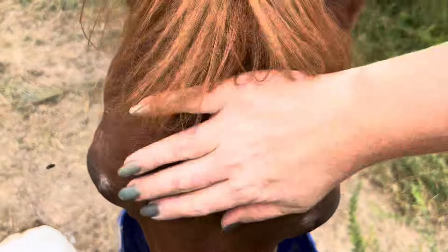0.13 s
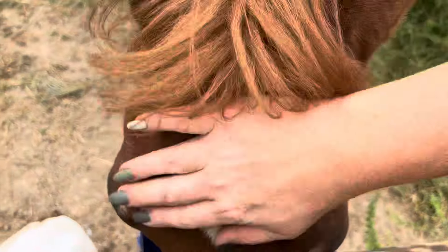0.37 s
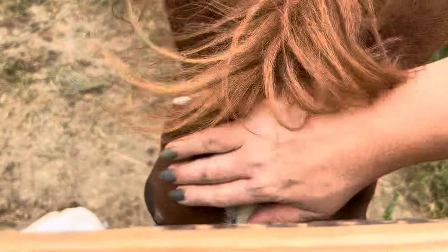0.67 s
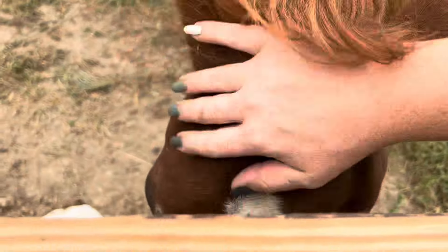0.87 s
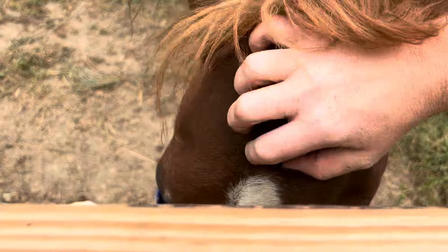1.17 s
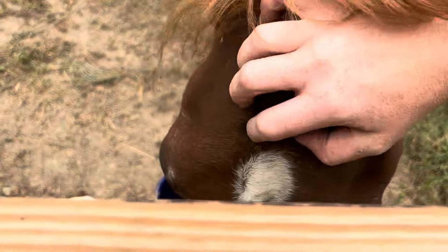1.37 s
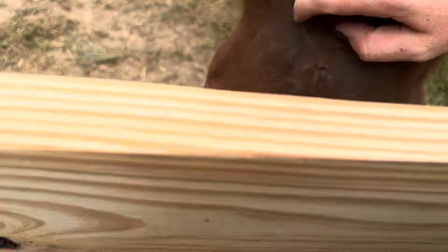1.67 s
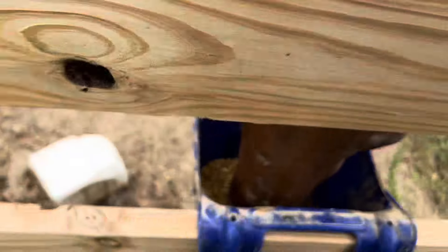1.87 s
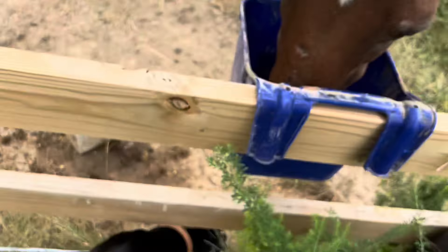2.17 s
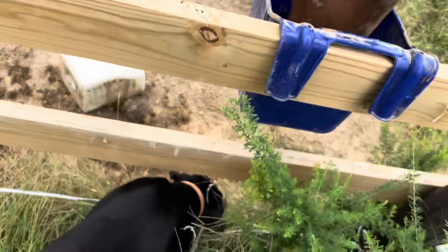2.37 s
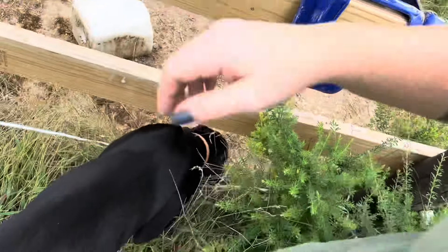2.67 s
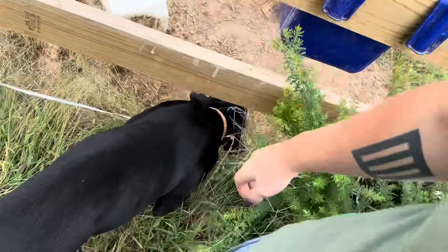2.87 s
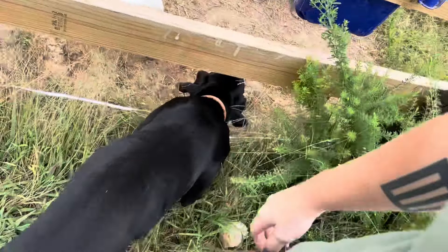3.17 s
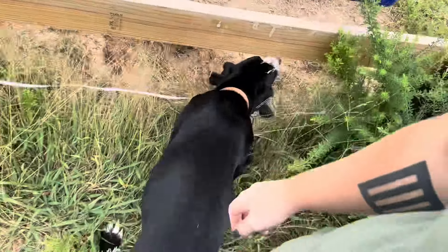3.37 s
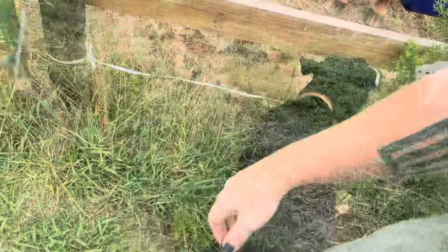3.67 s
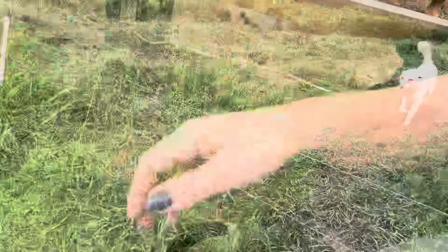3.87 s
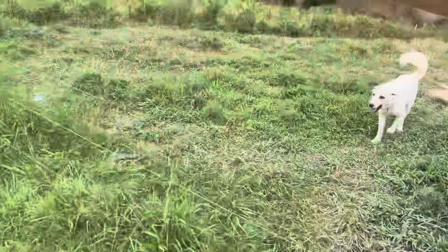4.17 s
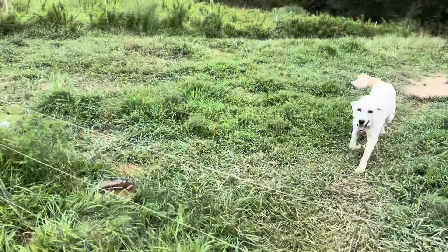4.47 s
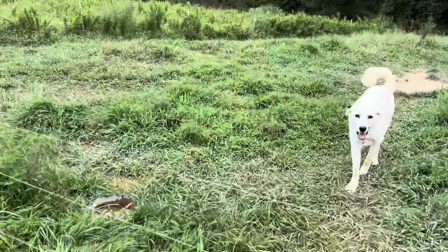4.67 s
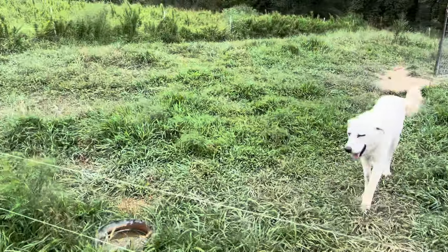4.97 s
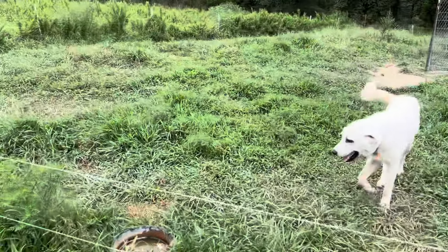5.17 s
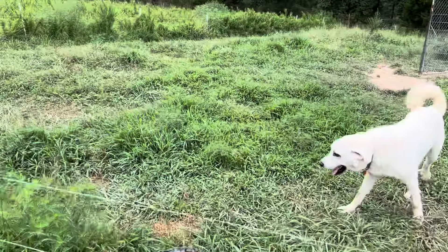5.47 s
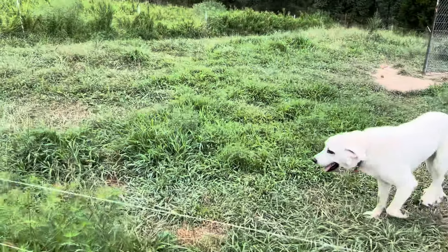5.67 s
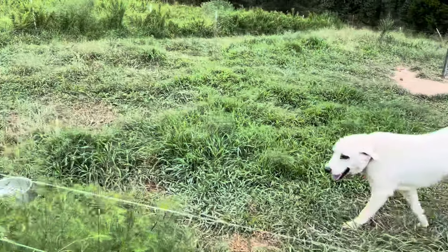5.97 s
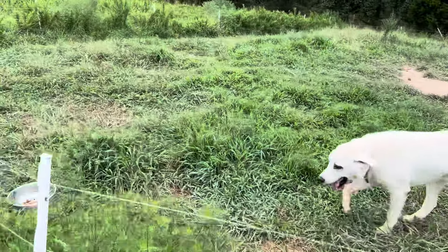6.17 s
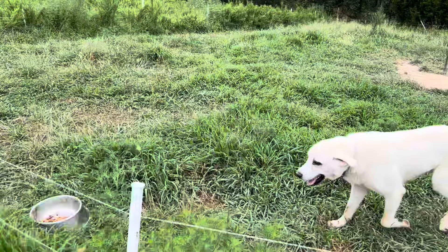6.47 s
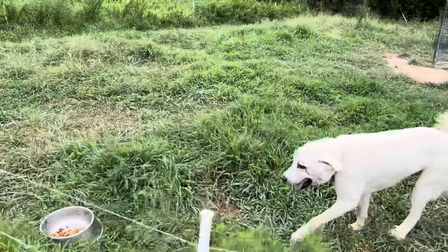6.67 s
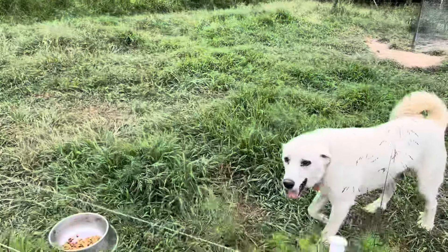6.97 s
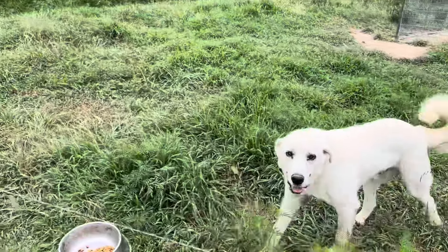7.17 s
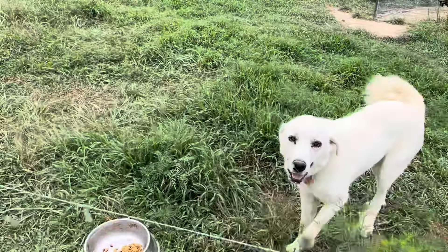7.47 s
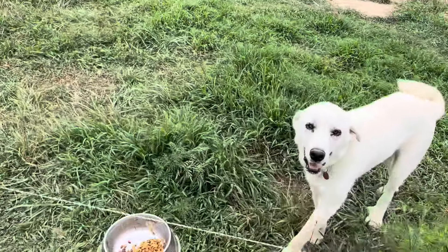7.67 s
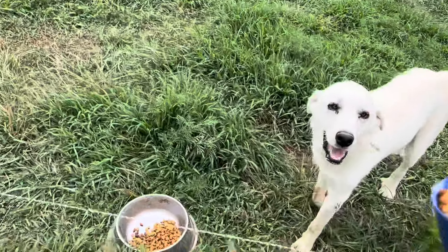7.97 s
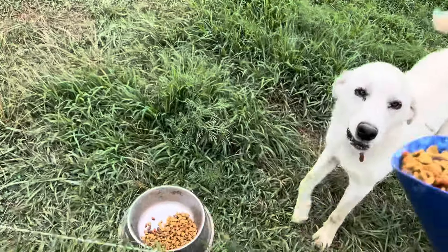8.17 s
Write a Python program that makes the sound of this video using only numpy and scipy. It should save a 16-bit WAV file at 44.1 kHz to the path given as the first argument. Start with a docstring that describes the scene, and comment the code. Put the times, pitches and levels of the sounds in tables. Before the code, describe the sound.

Close by, a horse roots in a plastic bucket on a wooden fence: low patter, small scrapes and hollow knocks, the loudest just after one second, before two and near four. A sharp snap comes midway. The patter then stops, leaving soft grass swishes from a dog's steps, tiny collar tinks and crickets over a light breeze. Handheld stereo microphone, outdoors in a meadow.

```python
"""Horse at the feed bucket, then the meadow

A horse noses through feed in a plastic bucket hung on a fence and knocks it against the boards: a swelling
air boom, ringing walls and a crack for each blow, over a grainy patter. A hand ruffles the coat.
The patter fades; steps swish as dense ticks in the grass and a collar tag tinks in decaying modes.
Pulsed sine crickets and a blurred chorus sing throughout over the low noise of a light breeze."""
import sys
import numpy as np
from scipy import signal
from scipy.fft import rfft, irfft
from scipy.io import wavfile
from scipy.ndimage import uniform_filter1d

SR = 44100
rng = np.random.default_rng(int(sys.argv[2]) if len(sys.argv) > 2 else 0)


def int16_out(signal):
    """Quantize to a 16-bit WAV file."""
    q = np.round(np.clip(np.atleast_2d(signal).T, -1, 1) * 32767)
    wavfile.write(sys.argv[1], SR, q.astype(np.int16))


N = 367353

# knocks of the bucket and soft thuds: t/s, level/dB, air f/Hz, squeezed-wall f/Hz,
# wall level/dB against the air boom, hardness/dB per octave
KNOCKS = [(0.017, -43.5, 240, 720, -4, -5), (0.052, -42.5, 226, 597, -4, -1),
          (0.134, -41, 247, 606, -5, -17), (0.294, -50.5, 238, 560, 3, -6), (0.482, -50, 243, 477, 7, -4),
          (0.489, -39.5, 243, 623, -20, -3), (0.675, -54, 200, 520, 6, 10), (0.854, -38, 280, 660, -32, -2),
          (1.003, -42, 191, 540, -27, 0), (1.013, -33, 161, 520, -3.5, 12), (1.039, -20, 194, 584, -11, 6),
          (1.059, -32, 198, 550, -25, -2), (1.099, -25, 173, 520, -15, -3), (1.104, -39, 250, 650, -2, -3),
          (1.126, -8, 249, 667, -2.5, 1), (1.142, -23.5, 258, 640, -14, -7),
          (1.169, -28, 248, 700, -11, -5), (1.1762, -17, 280, 860, -6, -6), (1.18, -34, 292, 866, 9, -13),
          (1.193, -33, 278, 660, -24, -6), (1.303, -39, 128, 560, -25, -5), (1.436, -45.5, 300, 755, 4, -5),
          (1.456, -49, 300, 650, 6, -3), (1.517, -31.5, 267, 660, -39, 0), (1.609, -45, 230, 692, -4, -2),
          (1.632, -47, 230, 700, -1, -5), (1.648, -36, 215, 580, -16, -5), (1.687, -40, 220, 580, -20, -4),
          (1.665, -33.5, 190, 560, -22, -6), (1.702, -27, 188, 555, -9, 8),
          (1.75, -29.5, 216, 604, -10, -6), (1.778, -24, 208, 600, -11, 5), (1.795, -36.5, 245, 620, 8, 3),
          (1.8052, -14.5, 235, 624, -6.5, 12.5), (1.82, -30, 266, 650, -25, 0),
          (2.36, -26.5, 201, 560, -3.5, 8.5), (2.386, -31, 251, 630, -14, -4),
          (2.399, -36, 232, 600, -12, -4), (2.45, -31, 253, 604, -1.5, 5),
          (2.829, -39.5, 253, 594, -0.5, 9), (2.927, -31.5, 263, 620, 1, 15), (2.95, -28, 260, 636, -8, -6),
          (3.011, -31.5, 298, 590, 8.5, 12.5), (3.02, -30.5, 300, 794, 4.5, 4),
          (3.028, -27, 265, 630, -17, 0), (3.041, -29, 263, 615, 3.5, 4), (3.05, -38, 60, 290, -40, 0),
          (3.056, -35, 196, 555, -1, 3), (3.068, -28.5, 174, 520, -25, 7), (3.094, -34, 240, 930, -12, 0),
          (3.116, -37, 232, 600, -24, 5), (3.143, -39.5, 249, 600, -19, 0),
          (3.709, -32.5, 298, 1080, -1.5, -6), (3.717, -27, 255, 600, -3, -4),
          (3.726, -20.5, 301, 763, 8.5, -3), (3.728, -9, 291, 870, -10.5, -6),
          (3.736, -28, 318, 700, -10, -10), (3.753, -30.5, 290, 705, -4, -2),
          (3.779, -42, 318, 646, -11, -2), (3.796, -45, 297, 654, -14, 0), (3.829, -45, 60, 290, -40, 0),
          (4.023, -48.5, 188, 550, 7, 11.5), (4.033, -46, 56, 290, -45, 0), (4.155, -50, 60, 288, -40, 0),
          (4.365, -44.5, 170, 520, 4, 18), (5.77, -45, 111, 706, 0, 8), (6.344, -52, 214, 580, 12, 12),
          (6.5, -47, 51.4, 292, -37, 0), (6.573, -46, 243, 610, -23, 3.5),
          (6.668, -44.5, 125, 500, -21, -10), (6.93, -51, 110, 500, -23, -10),
          (7.05, -52, 110, 500, -25, -10), (7.1946, -44, 420, 1150, 6.5, 0),
          (7.235, -45.5, 124, 500, -25, -10), (7.436, -59, 116, 500, -25, -13),
          (7.507, -51.5, 94, 500, -25, -10), (7.68, -51.5, 91, 503, -28, -8),
          (7.787, -49.5, 124, 500, -25, -10), (8.008, -44, 243.4, 620, -10, 14),
          (8.065, -51, 100, 500, -23, -10), (8.273, -33.5, 307, 574, -7, -9),
          (8.283, -47, 277, 540, -4, -8)]
# modes of the bucket walls before detuning and hardness tilt: f/Hz, level/dB, t60/s
WALLS = [(496, -60, 0.023), (627.5, 24.5, 0.013), (795, 6.5, 0.033), (1100, -27, 0.0056),
         (1270, -3.5, 0.027), (1737, -5.5, 0.019), (2420, -28, 0.036), (2650, -54, 0.041),
         (3400, -30.5, 0.01)]
# pitch of the air in the vessel as the muzzle fills it: t/s, f/Hz
AIR = [(0.0, 260), (0.71, 231), (0.78, 312), (1.02, 194), (1.22, 280), (1.34, 186), (1.43, 303),
       (1.73, 197.4), (2.18, 267), (2.39, 208), (2.52, 278), (3.15, 225), (3.44, 297), (3.96, 286),
       (4.0, 189), (4.1, 180)]
# the muzzle shoves into the feed: middle t/s, length/s, level/dB
SHOVES = [(0.02, 0.34, -52), (.13, 0.1, -52.5), (.29, 0.06, -58), (.41, 0.15, -51), (.51, 0.051, -52.5),
          (.65, 0.085, -52.5), (.84, 0.33, -51), (.96, 0.073, -44), (1.09, 0.3, -39), (1.35, 0.21, -52),
          (1.54, 0.36, -50), (1.72, 0.31, -44.5), (2.14, 0.48, -53), (2.4, 0.41, -48.5),
          (2.78, 0.26, -47.5), (2.96, 0.19, -39), (3.06, 0.25, -39.5), (3.26, 0.15, -48.5),
          (3.41, 0.088, -49), (3.5, 0.19, -48), (3.72, 0.31, -41), (3.84, 0.2, -51.5)]
# short drags, the bucket along the board, later feet and paws over the turf:
# t/s, length/s, level/dB before the envelope and upper body, centre f/Hz
SCUFFS = [(0.11, 0.037, -60.5, 1720), (0.215, 0.054, -64, 1170), (0.358, 0.04, -64, 1200),
          (0.426, 0.027, -63, 600), (0.72, 0.049, -63, 1400), (0.746, 0.035, -53.5, 685),
          (0.878, 0.046, -57, 553), (0.94, 0.039, -58, 640), (1.093, 0.059, -42.5, 487),
          (1.156, 0.042, -42.5, 450), (1.265, 0.033, -52.5, 590), (1.3, 0.11, -56.5, 690),
          (1.337, 0.028, -58, 1010), (1.393, 0.057, -54.5, 676), (2.37, 0.058, -54, 615),
          (2.467, 0.03, -51.5, 740), (2.522, 0.05, -53, 825), (2.632, 0.026, -52, 1370),
          (2.688, 0.038, -52, 900), (2.712, 0.067, -47, 640), (2.716, 0.07, -47, 1490),
          (2.778, 0.043, -54, 1100), (2.83, 0.089, -56, 905), (2.887, 0.058, -51, 800),
          (2.924, 0.057, -38.5, 654), (2.976, 0.065, -38.5, 880), (3.045, 0.066, -51, 900),
          (3.386, 0.035, -49, 400), (3.445, 0.096, -49.5, 780), (3.677, 0.076, -44, 670),
          (3.74, 0.037, -46.5, 663), (4.198, 0.062, -55.5, 910), (4.419, 0.1, -54.5, 1150),
          (4.76, 0.13, -56.5, 1130), (4.612, 0.047, -58.5, 660), (4.823, 0.043, -58, 418),
          (4.887, 0.078, -56.5, 900), (5.0, 0.069, -55.5, 810), (5.178, 0.038, -54.5, 534),
          (5.489, 0.089, -57, 930), (5.6, 0.072, -62, 710), (5.774, 0.014, -53.5, 603),
          (6.333, 0.041, -52.5, 507), (6.559, 0.035, -57, 340), (6.616, 0.12, -57.5, 950),
          (6.66, 0.033, -57, 1200), (6.722, 0.052, -55, 433), (6.894, 0.08, -53, 410),
          (6.924, 0.038, -54.5, 1000), (7.002, 0.054, -59, 480), (7.059, 0.019, -59, 1150),
          (7.192, 0.073, -48.5, 406), (7.2, 0.051, -57, 1280), (7.319, 0.08, -49.5, 415),
          (7.329, 0.058, -55, 1050), (7.516, 0.024, -54.5, 590), (7.96, 0.059, -54, 1000),
          (8.066, 0.038, -56.5, 444), (8.17, 0.13, -54.5, 400), (8.185, 0.036, -56, 1100),
          (8.2, 0.06, -55.5, 800)]
# dry stalks and the rim snapping: t/s, level/dB, centre f/Hz, then against the bright band:
# low thump level/dB, broad fizz level/dB
SNAPS = [(1.0145, -34, 3500, -11, 9), (2.356, -34.5, 2500, 2.5, -8), (2.6775, -45, 4000, -20, -8),
         (2.685, -21, 8400, -13, -6), (2.692, -25.5, 2900, -16, -7), (2.702, -39, 3000, -3, -10),
         (2.7073, -42, 4000, -4, -15), (2.7212, -25.5, 3950, -9, -8), (3.0421, -27, 2900, 8, -1),
         (3.2898, -35, 3200, -6, -3), (3.726, -23, 2710, -38, -12.5), (4.1128, -40, 3500, -6.5, -5),
         (4.649, -39, 2600, -1, -9), (7.0302, -29.5, 9000, -25, -7)]
# thin squeaks and peeps: t/s, length/s, start f/Hz, end f/Hz, rms level/dB if clean, roughness (0 = clean)
PEEPS = [(3.344, 0.06, 1690, 1850, -54, 0.56), (3.923, 0.044, 3940, 3900, -70.5, 0.033),
         (4.002, 0.034, 3800, 3970, -67.5, 0.2), (8.058, 0.05, 1626, 1763, -57.5, 0.45)]
# a hand ruffles the coat, then legs and paws brush the grass: middle t/s, length/s, level/dB
GRASS = [(.02, 0.028, -57), (.11, 0.053, -57.5), (.22, 0.1, -59), (.36, 0.064, -62), (.46, 0.2, -62.5),
         (.64, 0.042, -63), (.76, 0.099, -60.5), (.89, 0.067, -62), (1.02, 0.078, -59), (1.42, 0.2, -57.5),
         (1.61, 0.24, -60), (1.86, 0.13, -59.5), (2.1, 0.11, -60), (2.33, 0.36, -59), (2.75, 0.71, -62),
         (2.87, 0.099, -66), (2.94, 0.13, -53.5), (3.02, 0.13, -52), (3.15, 0.28, -51.5),
         (3.29, 0.11, -49.5), (3.37, 0.23, -56.5), (3.5, 0.36, -52), (3.7, 0.15, -52), (3.77, 0.04, -54.5),
         (3.85, 0.18, -58.5), (4.22, .1, -68), (4.36, 0.076, -56), (4.47, 0.28, -54), (4.6, 0.14, -63.5),
         (4.88, 0.33, -61.5), (5.04, 0.18, -57), (5.22, 0.084, -73), (5.43, 0.21, -59.5),
         (5.64, 0.19, -53.5), (5.8, 0.14, -57.5), (6.19, 0.17, -56), (6.7, 0.4, -53.5), (6.92, 0.066, -57),
         (7.06, 0.42, -55.5), (7.35, 0.26, -56), (7.5, 0.14, -64), (7.78, 0.24, -60), (8.0, 0.28, -52.5),
         (8.24, 0.21, -55), (8.33, 0.13, -53)]
# spectrum of the bright swish: f/Hz, level/dB per Hz
SWISH = [(2500, -0.5), (4000, -3), (5800, -2.5), (8500, 3.5), (11500, -4.5), (15500, -1.5)]
# spectrum of the bending stems: f/Hz, level/dB per Hz
STEMS = [(200, -4), (400, -2), (800, -5), (1500, -6), (2500, -12.5), (4000, -21)]
# strikes of the collar tag: t/s, level/dB
TINKS = [(5.7533, -40), (6.9122, -30)]
# modes of the tag: f/Hz, level/dB, t60/s
TAG = [(9060, -16, .03), (11300, -10, .012), (12720, 0, .094), (12850, -14, .08), (15400, -14, .02)]
# near singers (low, middle, high, two trillers), one list of bouts each: middle t/s, length/s, level/dB
SONGS = [
    [(.5, 0.89, -75), (1.5, 1.4, -68), (2.6, 0.9, -67.5), (4.8, 3.3, -70), (5.8, 0.94, -69),
     (6.75, 0.9, -63), (7.7, 1.2, -58.5), (8.3, 0.72, -58)],
    [(.5, 0.88, -63.5), (1.2, 1.8, -63), (4.5, 0.4, -82.5), (6.55, 0.18, -66.5)],
    [(3.1, .4, -71), (6.4, 0.53, -60), (7.3, 2.9, -61), (8, 0.71, -67)],
    [(5.19, 0.1, -62.5), (5.3, 0.3, -59.5), (5.43, 0.17, -65), (5.87, 0.1, -68), (5.97, 0.32, -69),
     (6.12, 0.26, -62.5)],
    [(6.265, .07, -65.5), (6.42, 0.32, -65.5), (6.57, .16, -71)],
]
# their wing strokes: strokes per s, middle of one stroke t/s
STROKES = [(21.32, 7.478), (22.9, .806), (25.9, 7.042), (47.2, 5.2865), (62, 6.331)]
# their notes: top f/Hz, fall from top to end/Hz, place of the top in the note (negative = falls throughout),
# share of the cycle sung, left minus right/dB
NOTES = [(6850, 600, .4, .65, 6), (7250, 500, .45, .55, 7), (7740, 300, .45, .5, 4),
         (5000, 520, -.3, .5, 9), (4980, 300, -.3, .6, 8)]
# far chorus, before each of its two layers is cut by 4 dB: t/s, level/dB
CHORUS = [(0, -54), (1.16, -55.5), (1.86, -56.5), (2.9, -59.5), (3.4, -60.5), (4.05, -59.5), (4.43, -56),
          (6.17, -55), (7.24, -54.5), (8.33, -53.5)]
# gusts at the microphone ports: middle t/s, length/s, level/dB
BREEZE = [(.14, .15, -64), (1.2, 0.14, -58), (1.9, 0.31, -64), (2.44, 0.17, -56), (3.08, 0.47, -59),
          (3.33, 0.13, -71), (4.7, 0.45, -61), (5.35, 0.33, -61), (5.78, 0.46, -59), (6.5, 0.84, -58),
          (7.0, 0.32, -57.5), (7.25, 0.15, -59), (7.7, 0.3, -64), (8.05, 0.41, -55.5)]
# spectrum of the gusts: f/Hz, level/dB per Hz
RUMBLE = [(25, -42.5), (40, -2), (55, -1), (80, -2), (130, -3.5), (250, -13.5), (500, -21.5)]

CRACK_DB = -51  # crack of a 0 dB knock of no hardness
CRACK_GROWTH, CRACK_HARD = 0.28, 0.59  # dB of crack per dB of knock, per dB of hardness
NIBBLE_DB = -62.5  # nibbling between shoves
RATTLE_DB, RATTLE_GROWTH = -76, 0.93  # rattle while nibbling; dB of rattle per dB of shove
AIR_FALL_DB = 12  # a nudge one octave off the air's pitch is this much weaker
FADE_END_S, FADE_LENGTH_S = 4.07, 0.19  # the patter dies away
SNAP_PAN_DB, SINGERS_PAN_DB = 6, 7  # left minus right
STIR_DB = -69.5  # grass at rest
STEMS_DB, STEMS_GROWTH = -62.5, 0.48  # stems at rest; dB of stems per dB of swish
WARM_UP_HZ, WARM_UP_S = 220, .05  # a bout starts flat by this and climbs to pitch with this time constant
SINGING_DB = -80  # the climb starts once the singer is this loud
CALM_DB = -60.5  # air between gusts
TREBLE_HZ, TOP_HZ = 8500, 15850
PORT_LAG_S, NEAR_LAG_S = 1 / 3450, 1 / 45000  # treble lag and lower-band lead of the left
T = np.arange(SR // 8) / SR  # s, time base of every short sound


def undb(db):
    """Amplitude ratio of a level in dB."""
    return 10 ** (np.asarray(db) / 20)


def unit(x):
    """Scale to rms 1."""
    return x / np.sqrt(np.mean(x ** 2))


def peak_unit(x):
    """Scale to peak 1."""
    return x / np.max(abs(x))


def curves(table):
    """Columns of a table as straight lines in time."""
    s, *columns = np.transpose(table)
    return [np.interp(np.arange(N) / SR, s, c, left=c[0], right=c[-1]) for c in columns]


def swells(table, rest_db=-120):
    """Level in dB of smooth swells, adding in power over a resting level."""
    t = np.arange(N) / SR
    power = undb(2 * rest_db)
    for middle, length, db in table:
        phase = np.pi * np.clip((t - middle) / length, -.5, .5)
        power = power + undb(2 * db) * np.cos(phase) ** 2
    return 10 * np.log10(power)


def colour(x, points):
    """Shape x by (Hz, dB) points, falling away outside them; rms 1."""
    hz, db = np.transpose(points)
    log_f = np.log(np.arange(1, N // 2 + 2) * SR / N)
    log_points = np.log(np.r_[hz[0] / 2, hz, hz[-1] * 2])
    gain_db = np.interp(log_f, log_points, np.r_[db[0] - 30, db, db[-1] - 30])
    return unit(irfft(rfft(x) * undb(gain_db), N))


def band(x, hz, spread):
    """Band-pass from hz / spread to hz * spread."""
    edges = [hz / spread, min(hz * spread, SR / 2.3)]
    return signal.sosfilt(signal.butter(2, edges, "band", fs=SR, output="sos"), x)


def walk(rate):
    """Random levels, rate of them a second, joined by straight slews; spread near 1."""
    k = int(SR / rate)
    held = np.repeat(rng.standard_normal(N // k + 1), k)
    return 1.2 * uniform_filter1d(held, k)[:N]


def grains(rate, spread_db):
    """Random clicks of both signs, rate of them a second, a few much larger than the rest."""
    hit = rng.random(N) < rate / SR
    return hit * rng.standard_normal(N) * undb(spread_db * rng.exponential(size=N))


def pan(x, db, alike=1.):
    """Place x, left minus right in dB; the unlike share goes to the right as a shifted copy."""
    a = np.clip(alike, 0, 1)
    other = np.roll(x, SR // 7)
    right = a * x + np.sqrt(1 - a * a) * other
    return np.array([x * undb(db / 2), right * undb(-db / 2)])


def add(out, s, sound):
    """Mix a short sound in at time s."""
    i = max(int(s * SR), 0)
    out[..., i:i + sound.shape[-1]] += sound[..., :N - i]


def ring(modes, rise_s, detune=1., tilt_db=0.):
    """Decaying modes after a push of rise_s; a harder blow tilts the energy upward. Peak 1."""
    hz, db, t60 = np.transpose(modes)[:, :, None]
    db = db + tilt_db * np.log2(hz / hz[1])
    decay = np.exp(-np.log(1000) * T / t60)
    y = np.sum(undb(db) * decay * np.sin(2 * np.pi * hz * detune * T), axis=0)
    return peak_unit(y * (1 - np.exp(-(T / rise_s) ** 2)))


def boom(hz, cycles, late_s=0.):
    """Air in the vessel, driven through the walls, swells for some cycles, then the muzzle damps it."""
    t = np.maximum(T - late_s, 0)
    u = t * hz / cycles
    return u * np.exp(.4 - 0.48 * u ** 1.526) * np.sin(2 * np.pi * hz * t)


def knocks():
    """Each blow booms the air, rings the detuned walls and cracks in a short noise burst."""
    out = np.zeros(N)
    for s, db, hz, wall_hz, wall_db, tilt_db in KNOCKS:
        detune = wall_hz / WALLS[1][0] * (1 + .02 * rng.standard_normal((len(WALLS), 1)))
        walls = ring(WALLS, .0013, detune, tilt_db)
        burst = rng.standard_normal(len(T)) * T / .001 * np.exp(-T / .0012)
        crack = peak_unit(band(burst, 2800, 1.6))
        crack_db = CRACK_DB + CRACK_GROWTH * db + CRACK_HARD * tilt_db
        air = boom(hz, cycles=0.81, late_s=0.0021)
        add(out, s, undb(db) * (air + undb(wall_db) * walls) + undb(crack_db) * crack)
    return out


def patter():
    """Dense small nudges boom the air near its shifting pitch; sliding feed rattles the walls."""
    boom_db = swells(SHOVES, NIBBLE_DB)
    rattle_db = RATTLE_DB + RATTLE_GROWTH * (boom_db - NIBBLE_DB)
    air_hz, = curves(AIR)
    air = 0
    for hz, db in [(115, 0.41), (175, 0), (215, 0), (260, 1), (315, 0.78)]:
        nudges = signal.fftconvolve(grains(250, 1.24), boom(hz, cycles=1.25))[:N]
        air = air + undb(db - AIR_FALL_DB * np.log2(hz / air_hz) ** 2) * nudges
    rattle = signal.fftconvolve(grains(2000, 1.6), ring(WALLS, .001, tilt_db=4.))[:N]
    air = undb(boom_db + 2 * walk(24.98)) * unit(air)
    rattle = undb(rattle_db + 2.5 * walk(14)) * unit(rattle)
    fade = np.clip((FADE_END_S - np.arange(N) / SR) / FADE_LENGTH_S, 0, 1)
    return fade * (air + rattle)


def bucket():
    """Knocks and patter share one body, so close that the two ports hear it differently."""
    out = knocks() + patter()
    # the crack leans left, the low middle right; a late copy around 800 Hz widens the rest
    side = .25 * band(out, 3000, 1.7) - .12 * band(out, 650, 1.5)
    side = side + .2 * band(np.roll(out, 40), 800, 1.8)
    return pan(out, -0.1) + side * np.array([[1], [-1]])


def scuffs():
    """Short stick-slip drags: uneven grains ring a broad body and a narrower one above it."""
    out = np.zeros(N)
    for s, length, db, hz in SCUFFS:
        a, b = rng.standard_normal((2, len(T)))
        shape = np.sin(np.pi * np.clip(T / length, 0, 1)) ** 0.64
        slips = a * undb(1.5 * unit(uniform_filter1d(b, size=200)) + 3.8 * abs(b[::-1]))
        body = unit(band(slips, hz, 1.41)) + 150 / hz * unit(band(slips, 2.59 * hz, 1.104))
        add(out, s, undb(db) * shape * body)
    return pan(out, 0.94)


def snaps():
    """A sharp break, a few splinters and a short crackling tail, with a duller thump under it."""
    out = np.zeros(N)
    for s, db, hz, thump_db, fizz_db in SNAPS:
        splinters = 0.14 * np.exp(-T / 0.0025) + 0.027 * np.exp(-T / 0.014)
        burst = (T == 0) + rng.standard_normal(len(T)) * splinters
        bright = band(burst, hz, 1.4) + undb(fizz_db) * burst
        thump = band(burst, 1070, 1.87)
        add(out, s, undb(db) * (peak_unit(bright) + undb(thump_db) * peak_unit(thump)))
    return pan(out, SNAP_PAN_DB)


def peeps():
    """Gliding tones, frayed in level and phase by slow noise."""
    out = np.zeros(N)
    noise = 10 * uniform_filter1d(rng.standard_normal((len(PEEPS), len(T))), size=100)
    for (s, length, start_hz, end_hz, db, rough), c in zip(PEEPS, noise):
        u = np.clip(T / length, 0, 1)
        phase = 2 * np.pi * np.cumsum(start_hz + (end_hz - start_hz) * u) / SR
        shape = 2 * np.sin(np.pi * u) * (1 + rough * c)
        add(out, s, undb(db) * shape * np.sin(phase + 2 * rough * c[::-1]))
    return pan(out, 2.)


def grass():
    """Thousands of blade ticks a second: a bright swish and a duller body of bending stems."""
    swish_db = swells(GRASS, STIR_DB)
    stems_db = STEMS_DB + STEMS_GROWTH * (swish_db - STIR_DB) + 1.44 * walk(14)
    swish = colour(grains(9000, 0.79), SWISH) * undb(swish_db + 2.05 * walk(25))
    stems = 0
    for hz in 220 * 2 ** np.arange(5):  # each octave flutters on its own
        stems = stems + undb(2.5 * walk(30)) * band(grains(6000, 2.), hz, 1.4)
    stems = colour(stems, STEMS) * undb(stems_db)
    return pan(swish, 8.6, alike=0.51) + pan(stems, -0.12, alike=0.57)


def tag():
    """A small metal disc struck by its ring: a broad tick over its decaying modes."""
    out = np.zeros(N)
    for s, db in TINKS:
        tick = band(rng.standard_normal(len(T)) * np.exp(-T / .0015), 12000, 1.7)
        add(out, s, undb(db) * (ring(TAG, .0001) + .5 * tick))
    return pan(out, 1.)


def cricket(rate, at_s, top_hz, fall_hz, crest, duty, wobble=0.):
    """One sine note a wing stroke; pitch bends in an arch about its top and falls as the scraper slows."""
    cycle = (np.arange(N) / SR - at_s) * rate + duty / 2 + wobble
    u = np.minimum(cycle % 1 / duty, 1)  # place in the note
    stroke = (cycle - np.floor(cycle.min())).astype(int) % 500
    size, pitch = rng.standard_normal((500, 2))[stroke].T  # each stroke differs a little
    hz = top_hz * (1 + .006 * pitch) - fall_hz * (u - crest) ** 2 / (1 - crest) ** 2
    level = undb(.7 * size + 1.5 * walk(150)) * np.sin(np.pi * u)
    return level * np.sin(2 * np.pi * np.cumsum(hz) / SR)


def near_crickets():
    """Singers that stand out in bouts, each climbing to pitch as its wings warm up."""
    near_db = [swells(bouts) for bouts in SONGS]
    keep = np.exp(-1 / (WARM_UP_S * SR))
    out = 0
    for db, stroke, (top_hz, *note, pan_db) in zip(near_db, STROKES, NOTES):
        flat = signal.lfilter([1 - keep], [1, -keep], 1. * (db < SINGING_DB))
        song = cricket(*stroke, top_hz - WARM_UP_HZ * flat, *note, wobble=0.045 * walk(4.7))
        out = out + pan(unit(song) * undb(db), pan_db)
    # neighbours of the middle singer, slightly out of step, thicken its pitch
    for hz, rate, at_s in [(7100, 23.6, .52), (7350, 22.2, .81), (6950, 22.6, .83)]:
        song = unit(cricket(rate, at_s, hz, 500, .45, .6, wobble=.2 * walk(2)))
        out = out + pan(song * undb(near_db[1]), SINGERS_PAN_DB, alike=.7)
    return out


def far_crickets(count=22):
    """A chorus scattered over the meadow; the farthest blur together into coloured noise."""
    chorus_db, = curves(CHORUS)
    far = 0
    for a, b, c, d in rng.random((count, 4)):
        top_hz = 6650 + 950 * a + 150 * c
        song = cricket(20 + 7 * a, b, top_hz, 600, 0.37, .6, wobble=0.192 * walk(1.0))
        far = far + pan(song * undb(2.7 * walk(1.7)), SINGERS_PAN_DB + 6 * (d - .5))
    # deep trillers below and high singers above: f/Hz, level/dB
    haze = colour(rng.standard_normal(N), [(4400, -21.0), (4800, -12.0), (5200, -21.5), (6000, -19.0),
                                           (6600, -7.0), (7700, -8.5), (8300, -21.0)])
    haze = pan(haze, SINGERS_PAN_DB, alike=.7)
    return undb(chorus_db) * (undb(-4) * unit(far) + undb(-4) * haze)


def breeze():
    """Low turbulence, only loosely related at the two ports."""
    level_db = swells(BREEZE, CALM_DB) + 3 * walk(8)
    return pan(colour(rng.standard_normal(N), RUMBLE) * undb(level_db), -1.5, alike=0.39)


def scene():
    """All layers, from the bucket back to the breeze."""
    animals = bucket() + scuffs() + snaps() + peeps() + grass() + tag()
    return animals + near_crickets() + far_crickets() + breeze()


def record(dry):
    """The treble is the mean of both channels, late in the left and inverted in the right.
    Below it the left port hears slightly earlier. The top is cut."""
    hz = np.arange(N // 2 + 1) * SR / N
    left, right = rfft(dry)
    treble = (left + right) / 2
    high = hz > TREBLE_HZ
    late_treble = treble * np.exp(-2j * np.pi * hz * PORT_LAG_S)
    early_left = left * np.exp(2j * np.pi * hz * NEAR_LAG_S)
    left = np.where(high, late_treble, early_left)
    right = np.where(high, -treble, right)
    both = irfft(np.array([left, right]), N)
    return signal.sosfilt(signal.ellip(10, .2, 70, TOP_HZ, fs=SR, output="sos"), both)


dry = scene()
out = record(dry)
int16_out(out)
```